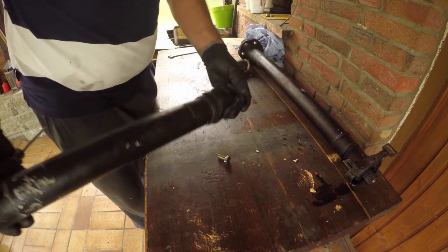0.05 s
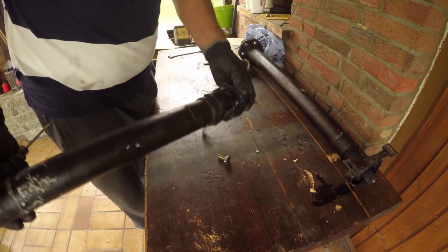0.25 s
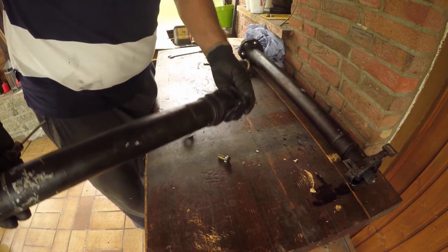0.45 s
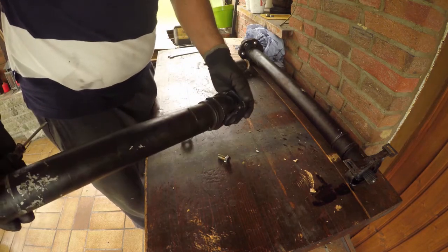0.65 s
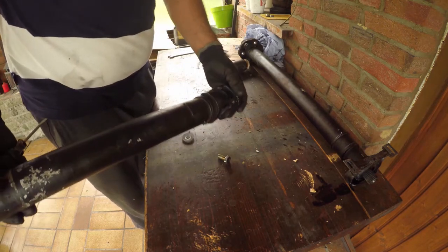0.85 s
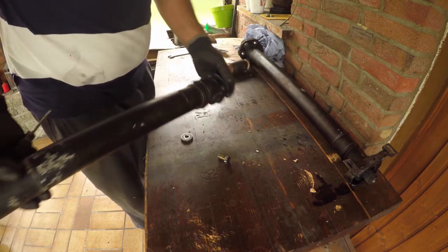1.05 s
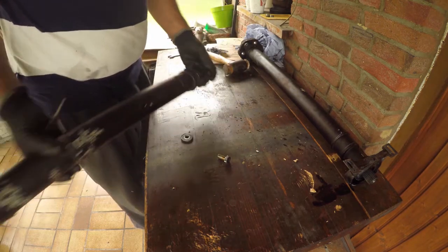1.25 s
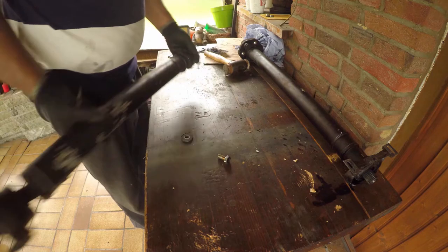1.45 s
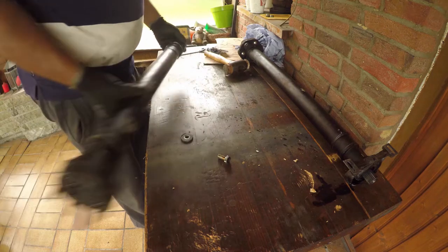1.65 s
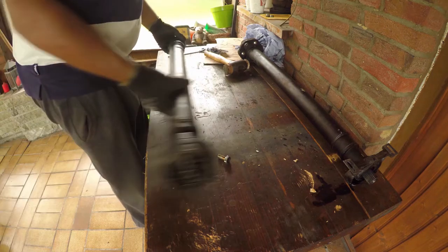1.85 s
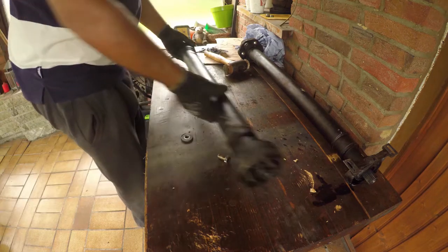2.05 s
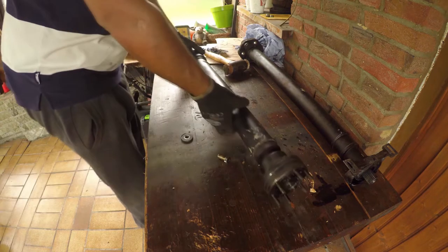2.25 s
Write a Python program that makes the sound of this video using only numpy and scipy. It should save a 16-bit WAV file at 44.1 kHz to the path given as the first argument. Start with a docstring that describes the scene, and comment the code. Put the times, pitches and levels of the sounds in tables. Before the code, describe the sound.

A steel washer clinks off a shaft, bounces on a wooden bench and rattles flat.

```python
"""Over low rumble, hiss and a very faint whine, a thick steel washer slips off the end of a drive shaft:
the impacts excite the flange's modes in a clink, and a small workshop adds a short tail.
The washer drops on a wooden workbench and bounces; the steel rings, the bench top rings and booms.
It then rolls on, rocking over its rim in short rattles, each a run of tiny contacts with the wood,
and at about 1.2 s it falls flat."""
import sys
import numpy as np
from scipy import signal
from scipy.fft import irfft
from scipy.io import wavfile

SR = 44100
rng = np.random.default_rng(int(sys.argv[2]) if len(sys.argv) > 2 else 0)


def inscribe(sig):
    """Save sig as 16-bit PCM at rate SR to the path in sys.argv[1].

    A 1-D sig is mono; a 2-D sig holds one channel per row.
    Samples are clipped to [-1, 1] before scaling.
    """
    pcm = np.round(np.clip(np.atleast_2d(sig).T, -1, 1) * 32767)
    wavfile.write(sys.argv[1], SR, pcm.astype(np.int16))


N = 101429

# spectrum of the room's hiss: (frequency [Hz], relative level [dB])
HISS_SPECTRUM = [(12, -30), (20, -0.5), (39, -3), (125, -16), (195, -14), (270, -21.5), (310, -22),
                 (365, -22.5), (787, -25), (1090, -27.5), (3020, -29), (14000, -40.5)]
# low rumble while the shaft is handled: (time [s], level [dB])
RUMBLE_ENVELOPE = [(0, -63.5), (.27, -61.5), (.36, -44), (.6, -52.5), (.75, -63.5), (.9, -61),
                   (1.25, -59.5), (1.5, -60.5), (1.75, -71), (2.13, -65), (2.19, -54), (2.3, -71)]
# washer scraping off the flange: (time [s], relative level [dB], treble limit [Hz])
FLANGE_HITS = [(.026, -29, 2440), (.2016, -9.5, 11700), (.2028, -6.5, 10500), (.2128, -5, 2600)]
# shaft flange modes: (frequency [Hz], relative level [dB], T60 [s])
FLANGE_MODES = [(376, -19.5, 0.11), (1940, -10, 0.03), (2250, -11.5, 0.035), (3090, -36, 0.11),
                (3250, -5.5, 0.021), (3434, 0, 0.019), (3780, -4, 0.054), (4520, -6.5, 0.081),
                (4990, -7.5, 0.026), (5570, -8.5, 0.027), (6470, -6, 0.016), (7000, -18, 0.1),
                (7943, -14.5, 0.12), (9220, -35, 0.097)]
# spectrum of a hard contact: (frequency [Hz], relative level [dB])
CRACK_SPECTRUM = [(150, -19), (380, -5), (700, -12.5), (1300, -4), (2100, 3.5), (3500, 13), (4100, -3.5),
                  (5000, 0), (6000, -15), (6700, -5.5), (9000, -7), (15500, -6.5)]
# reverberation time of the workshop: (frequency [Hz], T60 [s])
ROOM_DECAY = [(150, .55), (1000, 0.46), (3500, 0.19), (9000, 0.43)]
# washer striking the bench: (time [s], knock gain [dB], boom gain [dB], treble limit [Hz])
BENCH_HITS = [(0.2982, -8, -13, 1560), (0.3046, -5.5, -3.5, 1170), (0.332, -16.5, -35, 1650),
              (.3605, -9, -11.5, 1840), (0.425, -11.5, -30, 1090)]
# bench top modes: (frequency [Hz], relative level [dB], T60 [s])
WOOD_MODES = [(393, -17, .3), (472, -10, .3), (790, -12, .16), (920, -5, .22), (1000, -14, .13),
              (1283, -6, .16), (1558, -4, .14), (1770, -7, .12), (2010, -8, .1), (2205, 1, .1),
              (2300, 5, .025), (2368, 3, .1), (2710, -3, .08), (2860, 0, .1), (3400, -4, .04)]
# slow bending modes of the whole bench: (frequency [Hz], relative level [dB], T60 [s])
BOOM_MODES = [(61, -15, 1.2), (146.5, 0, .7), (161, -2, .25), (186, -10, .14), (222, -15, .18)]
# spectrum of the struck wood's dense modes: (frequency [Hz], relative level [dB])
KNOCK_SPECTRUM = [(100, -27), (200, 12.5), (300, -12.5), (430, 9), (600, -6), (820, 5), (1300, 0.5),
                  (2400, 5), (3200, 7), (4500, -7.5), (12000, -11)]
# washer ringing as it bounces: (time [s], relative level [dB], treble limit [Hz])
WASHER_HITS = [(.3330, -21, 6100), (.3610, -6, 4230), (.3632, -5, 6100), (.3675, -21, 4180)]
# washer modes: (frequency [Hz], relative level [dB], T60 [s])
WASHER_MODES = [(1836, -4, .11), (2005, -3, .1), (2450, 3, .03), (2800, -7, .07), (3190, -4, .13),
                (3325, -4, .13), (3738, -2, .11), (3785, -4, .07), (4540, -4, .06), (5590, -9, .05),
                (7640, -22, .04)]
# rim skidding and rocking: (time [s], duration [s], level [dB], treble limit [Hz], boom gain [dB])
RIM_SWINGS = [(0.338, 0.0073, -12.5, 2920, -46), (0.592, 0.025, -18.5, 1950, -72),
              (0.702, 0.018, -20, 3200, -29), (0.803, 0.035, -21, 2840, -27),
              (0.896, 0.0307, -19, 4370, -39), (0.942, 0.037, -30.5, 3330, -32.5),
              (.985, 0.012, -17.5, 4100, -31), (1.052, 0.016, -18, 2780, -27),
              (1.160, 0.024, -27.5, 2040, -34), (1.204, 0.0065, -15, 3060, -20.5)]
# spectrum of the wood under the rim: (frequency [Hz], relative level [dB])
RATTLE_SPECTRUM = [(200, -19), (470, -6), (660, -10), (920, 0.5), (1500, -4.5), (2350, 4.5), (3100, 3),
                   (4000, -0.5), (6000, -6), (12000, -5)]

HISS_DB, HISS_WAVER_DB = -60, 0.56
WHINE_HZ, WHINE_DB, WHINE_PULSES_PER_S = (14696, 10799), (-75, -82), 15
FLANGE_GAIN_DB, FLANGE_CRACK_GAIN_DB, CRACK_T60_S = -3.5, -8, 0.024
ROOM_DB, ROOM_DELAY_S = -8.5, .006
KNOCK_GAIN_DB, KNOCK_T60_S, KNOCK_MODES_GAIN_DB, BOOM_GAIN_DB = -1.5, 0.17, -11.5, -32.5
WASHER_GAIN_DB, WASHER_CRACK_GAIN_DB = -7.5, -3
RATTLE_GAIN_DB, RATTLE_T60_S, RATTLE_MODES_GAIN_DB = 1, 0.11, -2.5
CONTACTS_PER_S, CONTACT_SCATTER_DB = 1200, 3.5
TOP_HZ = 15400


def undb(db):
    """The decibel law: 20 dB is a factor of ten in amplitude."""
    return 10 ** (np.asarray(db) / 20)


def unit(x):
    """Normalisation to unit energy."""
    return x / np.sqrt(np.sum(x ** 2) + 1e-18)


def clock():
    """Uniform sampling: the time of each sample in seconds."""
    return np.arange(N) / SR


def curve(hz, points):
    """Interpolation of (frequency, value) points on a logarithmic frequency axis."""
    frequencies, values = np.array(points).T
    return np.interp(np.log(np.maximum(hz, 1)), np.log(frequencies), values)


def noise(spectrum):
    """Fourier synthesis: random phases under a given spectrum make noise of rms 1."""
    gain = undb(curve(np.fft.rfftfreq(N, 1 / SR), spectrum))
    phasors = np.exp(2j * np.pi * rng.random(len(gain)))
    return unit(irfft(gain * phasors, N)) * np.sqrt(N)


def fade(t60):
    """Exponential damping: a fall of 60 dB in t60 seconds."""
    return np.exp(-np.log(1000) * clock() / t60)


def soften(x, hz, order=2):
    """Contact compliance acts as a low-pass: a softer contact has less treble."""
    return signal.sosfilt(signal.butter(order, min(hz, SR / 2 - 1000), fs=SR, output="sos"), x + 1e-18)


def ring(modes, alternate=True):
    """Modal superposition: damped sines, with neighbours in antiphase if they alternate."""
    return sum((-1 if alternate and k % 2 else 1) * undb(db) * fade(t60)
               * np.sin(2 * np.pi * hz * clock()) for k, (hz, db, t60) in enumerate(modes))


def at(x, start):
    """Pure delay by start seconds."""
    return np.concatenate([np.zeros(int(start * SR)), x])[:N]


def through(x, response):
    """Convolution: a linear body or room answers each input sample with its impulse response."""
    return signal.fftconvolve(x, response)[:N]


def background():
    """Amplitude modulation of noise: the hiss wavers slightly, the rumble swells and sinks."""
    t = clock()
    waver = np.interp(t, np.linspace(0, t[-1], num=40), rng.standard_normal(size=40))
    rumble = noise([(15, -5), (42, -4.5), (60, 0.5), (80, -11), (110, -8.5), (250, -38), (1000, -68)])
    rumble_db = np.interp(t, *np.array(RUMBLE_ENVELOPE).T)
    hiss = noise(HISS_SPECTRUM) * undb(HISS_DB + HISS_WAVER_DB * waver)
    return hiss + rumble * undb(rumble_db)


def whine():
    """Periodic gating of two high pure tones gives a very faint, pulsing electronic whine."""
    t = clock()
    gate = np.clip(.5 + 2 * np.sin(2 * np.pi * WHINE_PULSES_PER_S * t - 1), 0, 1)
    return gate * sum(undb(db) * np.sin(2 * np.pi * hz * t) for hz, db in zip(WHINE_HZ, WHINE_DB))


def clinks(hits, modes, ring_db, crack_db):
    """Impulse excitation: a hard contact gives a broadband crack and sets the steel ringing freely."""
    steel = undb(ring_db) * unit(ring(modes))
    out = 0
    for start, db, treble_hz in hits:
        crack = undb(crack_db) * unit(noise(CRACK_SPECTRUM) * fade(CRACK_T60_S))
        out += undb(db) * at(soften(steel + crack, treble_hz), start)
    return out


def workshop(x):
    """Diffuse reverberation: octave bands decay, fastest near 3 kHz; deep bass is barely returned."""
    tail = 0
    for hz in 350 * 2 ** np.arange(6):
        edges_hz = [hz / np.sqrt(2), hz * np.sqrt(2)]
        band = signal.butter(3, edges_hz, "band", fs=SR, output="sos")
        tail += signal.sosfilt(band, rng.standard_normal(N)) * fade(curve(hz, ROOM_DECAY))
    return undb(ROOM_DB) * through(x, at(unit(tail), ROOM_DELAY_S))


def landings():
    """Free vibration: each landing rings the dense wood modes, and the bench booms as it bends."""
    wood = undb(KNOCK_MODES_GAIN_DB) * unit(ring(WOOD_MODES))
    boom = undb(BOOM_GAIN_DB) * ring(BOOM_MODES, alternate=False)
    out = 0
    for start, db, boom_db, treble_hz in BENCH_HITS:
        dense_modes = undb(KNOCK_GAIN_DB) * unit(noise(KNOCK_SPECTRUM) * fade(KNOCK_T60_S))
        knock = soften(wood + dense_modes, treble_hz)
        out += at(undb(db) * knock + undb(boom_db) * boom, start)
    return out


def rocking():
    """Forced vibration: each swing of the rim drives the bench with a swelling run of tiny contacts."""
    wood = undb(RATTLE_MODES_GAIN_DB) * unit(ring(WOOD_MODES))
    boom = undb(BOOM_GAIN_DB) * ring(BOOM_MODES, alternate=False)
    out = 0
    for start, duration, db, treble_hz, boom_db in RIM_SWINGS:
        progress = clock() / duration
        swell = (progress < 1) * (1 + np.sin(np.pi * progress))  # starts abruptly at half its peak
        contacts = rng.random(N) < CONTACTS_PER_S / SR
        contacts[0] = True
        strength = undb(CONTACT_SCATTER_DB * rng.standard_normal(N))
        polarity = np.sign(rng.standard_normal(N))
        force = swell * contacts * strength * polarity
        dense_modes = undb(RATTLE_GAIN_DB) * unit(noise(RATTLE_SPECTRUM) * fade(RATTLE_T60_S))
        rattle = unit(soften(through(force, wood + dense_modes), treble_hz, order=3))
        out += at(undb(db) * rattle + undb(boom_db) * boom, start)
    return out


def scene():
    """Superposition: direct sound, reverberation and background add in one channel."""
    slips = clinks(FLANGE_HITS, FLANGE_MODES, FLANGE_GAIN_DB, FLANGE_CRACK_GAIN_DB)
    bounces = clinks(WASHER_HITS, WASHER_MODES, WASHER_GAIN_DB, WASHER_CRACK_GAIN_DB)
    direct = slips + bounces + landings() + rocking()
    return (direct + workshop(direct) + background() + whine())[None]


def record(dry):
    """Band limiting: a steep elliptic low-pass removes the highest treble."""
    return signal.sosfilt(signal.ellip(8, .2, 70, TOP_HZ, fs=SR, output="sos"), dry)


dry = scene()
out = record(dry)
inscribe(out)
```